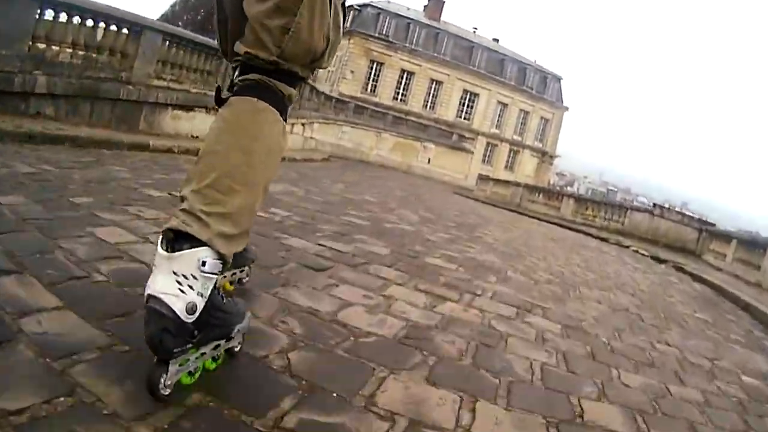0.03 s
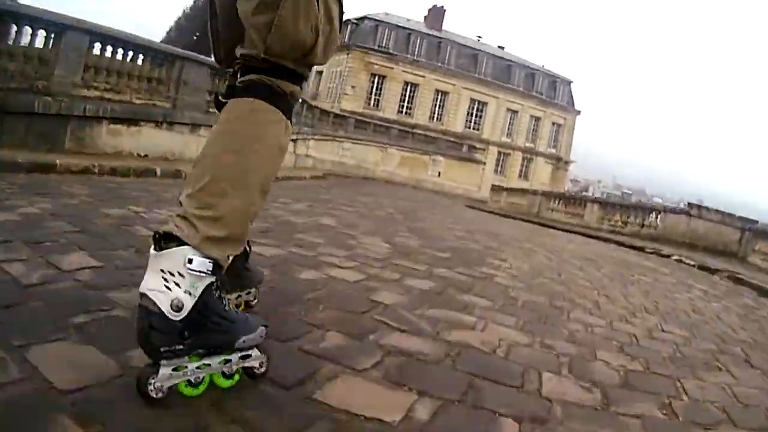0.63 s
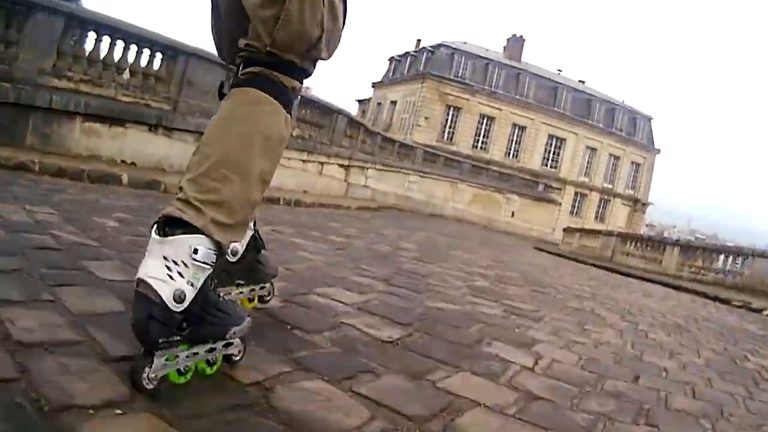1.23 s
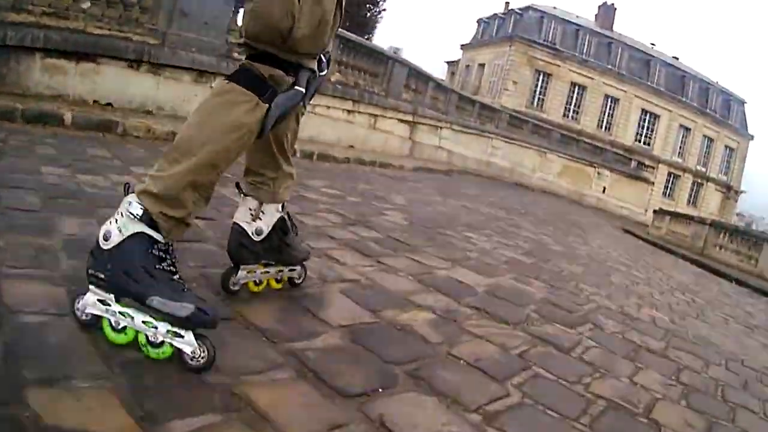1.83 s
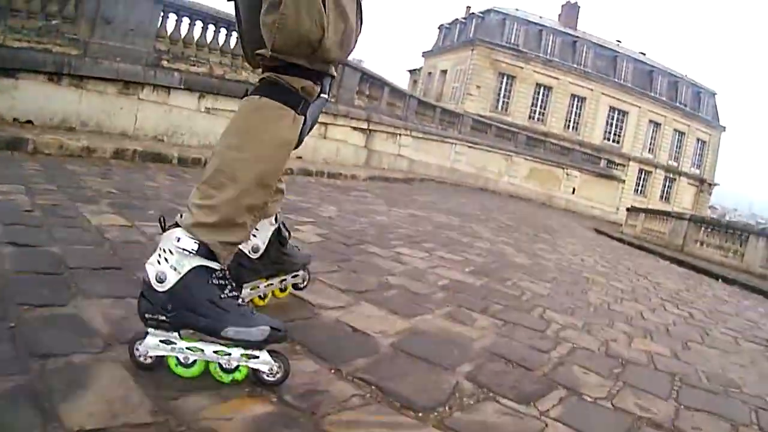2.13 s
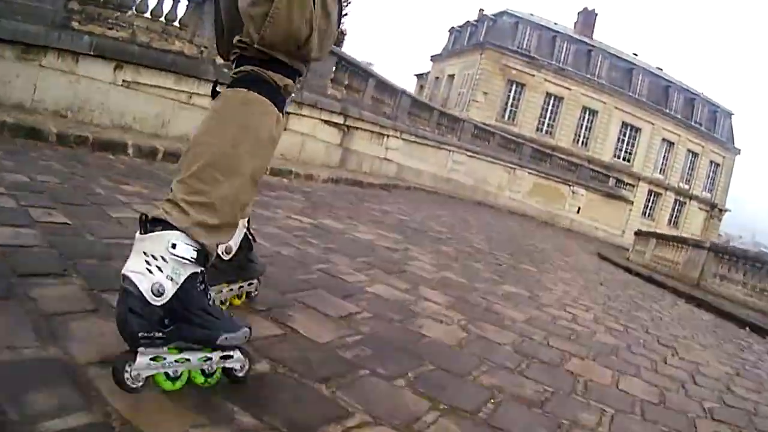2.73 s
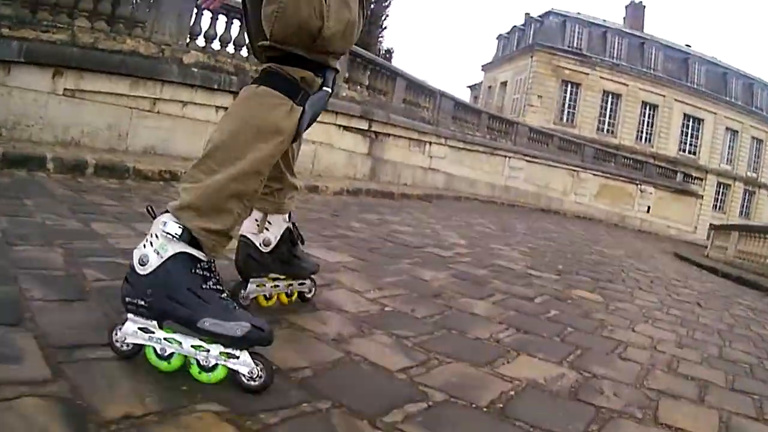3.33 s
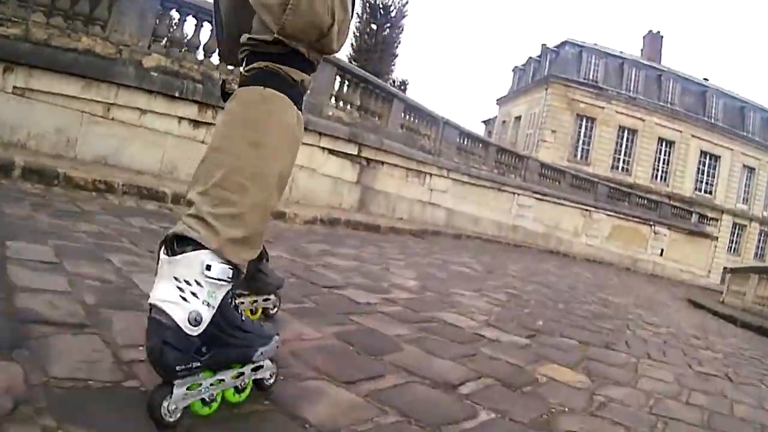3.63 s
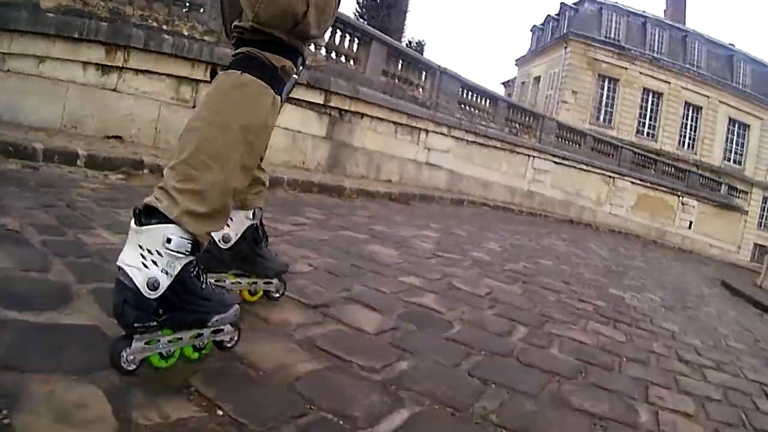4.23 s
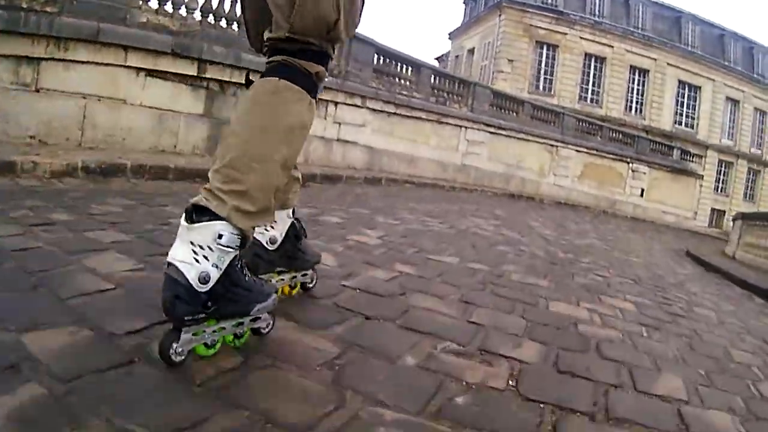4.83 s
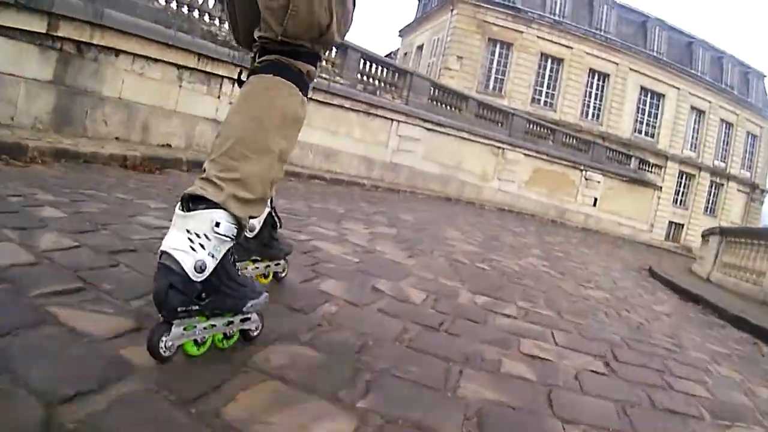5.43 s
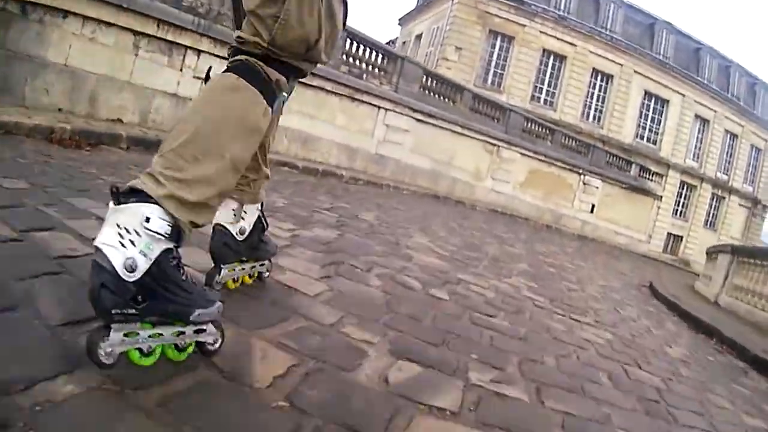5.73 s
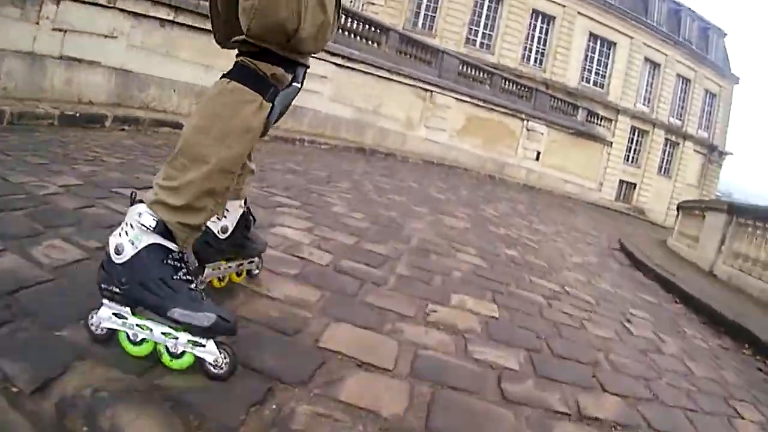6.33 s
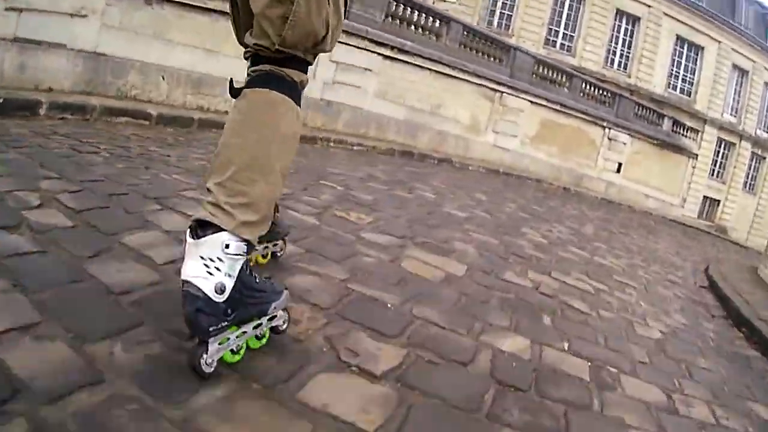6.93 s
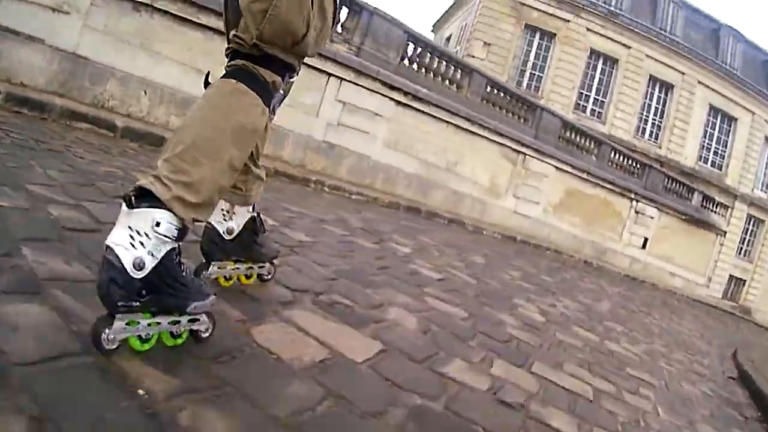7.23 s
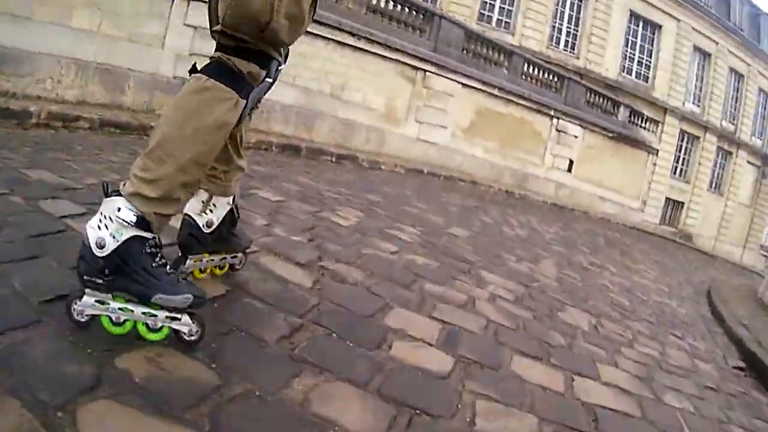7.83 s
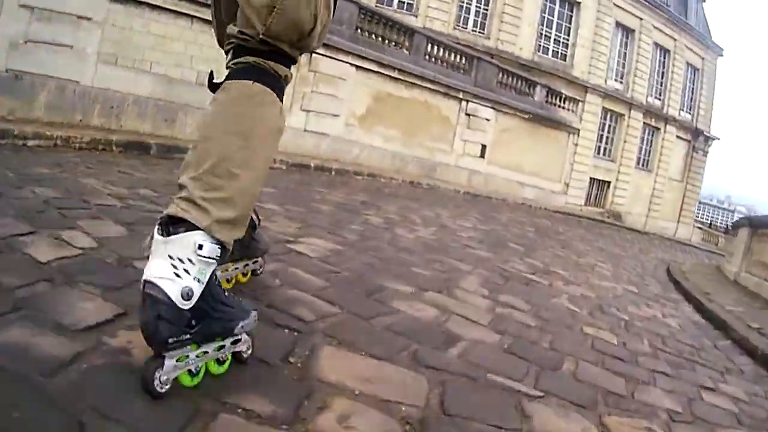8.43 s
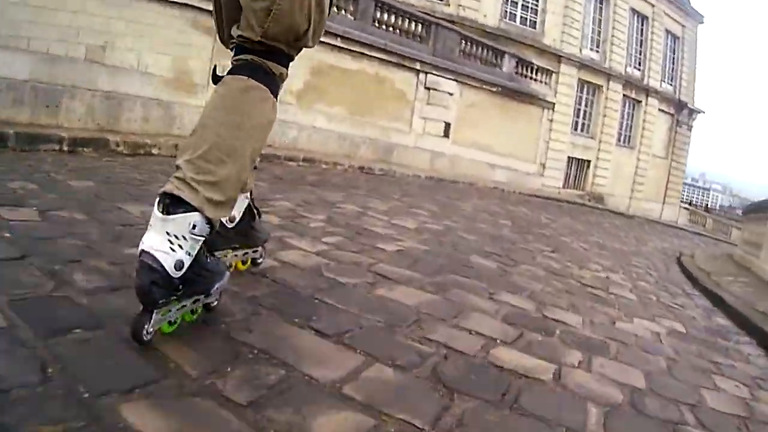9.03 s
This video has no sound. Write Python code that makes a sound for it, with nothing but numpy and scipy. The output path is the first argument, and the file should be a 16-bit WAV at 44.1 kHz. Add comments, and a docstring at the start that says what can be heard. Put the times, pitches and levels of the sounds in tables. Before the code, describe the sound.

A continuous, irregular clatter of inline skate wheels crosses cobblestones outdoors. Each stone gives a dull thud, a hollow knock and a tick, with scattered boot bumps, metallic frame clicks and gritty cracks. The clatter sharpens in several bursts, brightest about three quarters of the way through. The close microphone, in a small cased camera on a pole, picks up low shuddering and gusty wind, with a faint hiss and thin whine behind.

```python
"""On a wet cobbled street, inline skates roll along, heard from a small cased camera on a pole.
The wheels chatter over the rough stone and strike the joints; each contact rings boot and case
with a low thud, a hollow knock and a bright tick. Wheels slap the metal frame, heels knock the
boot shell and grit cracks. Underneath, the pole shudders and wind rumbles over a faint hiss
and an electronic whine."""
import sys
import numpy as np
from scipy import signal
from scipy.fft import rfft, irfft, next_fast_len
from scipy.io import wavfile
from scipy.ndimage import uniform_filter1d

SR = 44100
rng = np.random.default_rng(int(sys.argv[2]) if len(sys.argv) > 2 else 0)


def int16_out(signal):
    """Quantize to a 16-bit WAV file."""
    q = np.round(np.clip(np.atleast_2d(signal).T, -1, 1) * 32767)
    wavfile.write(sys.argv[1], SR, q.astype(np.int16))


N = 400869
TIME = np.arange(N) / SR
RING_SIZE = 4096   # samples set aside for one ring

# the low, middle and high pitches (modes) at which boot and case ring: f/Hz, width/Hz, relative level/dB
THUD_MODES = [(195, 72, 0), (312, 136, -3.5), (440, 136, -10), (558, 129, -8), (729, 124, -9)]
KNOCK_MODES = [(805, 43, -12), (930, 113, -9.5), (998, 82, -6.5), (1120, 77, 0.8), (1307, 94, -8),
               (1401, 133, -13), (1643, 420, -28), (1939, 125, -18.5)]
TICK_MODES = [(2409, 328, -12), (2794, 145, -.5), (3035, 149, 0), (3328, 179, -11.5), (3604, 209, -5.5),
              (3936, 167, -15), (4263, 184, -7.5), (4480, 200, -16), (5148, 360, -16.5), (5438, 231, -17.5),
              (5950, 292, -19.5), (8450, 1306, -32)]
# a wheel slams into a raised stone: t/s, then relative knock level/dB, thud level/dB, tick level/dB
RAISED_STONES = [(0.06, -50, -63, -60), (0.145, -41, -65, -75), (0.198, -45, -55, -60),
                 (0.243, -39.5, -71, -69), (0.317, -35.5, -54, -58), (0.333, -44, -53, -60),
                 (0.418, -41, -59, -62), (0.507, -38, -56, -60), (0.65, -40, -60, -63),
                 (0.783, -39.5, -57, -59), (0.827, -36, -54, -59), (0.977, -39, -51, -54),
                 (1.048, -36.5, -52, -55.5), (1.104, -39.5, -55, -58.5), (1.131, -51, -62, -60),
                 (1.187, -39.5, -65, -63), (1.208, -40.5, -64, -64), (1.349, -38, -57, -56.5),
                 (1.372, -35.5, -57, -57), (1.388, -32, -55, -52.5), (1.461, -35.5, -54, -58),
                 (1.501, -35, -49, -53.5), (1.525, -44, -51, -55), (1.55, -37.5, -50, -54),
                 (1.576, -34, -63, -54), (1.593, -32.5, -49, -53), (1.602, -32, -54, -56),
                 (1.628, -50, -57, -62), (1.685, -48, -62, -55.5), (1.692, -35.5, -51, -58),
                 (1.744, -40.5, -62, -81), (1.803, -39.5, -54, -63), (1.891, -38, -53, -57),
                 (1.935, -39.5, -60, -58), (1.973, -50, -66, -72), (2.016, -37.5, -61, -61),
                 (2.035, -38.5, -62, -61), (2.078, -39, -62, -63), (2.235, -42.5, -56, -61),
                 (2.258, -40, -51, -58), (2.284, -40, -51.5, -63), (2.304, -37.5, -61, -69),
                 (2.377, -43, -71, -62), (2.429, -38, -56, -59), (2.453, -42, -51, -63),
                 (2.523, -39.5, -52, -63), (2.626, -38, -65, -60), (2.655, -38, -61, -66),
                 (2.69, -45, -67, -58), (2.738, -56, -67, -58.5), (2.849, -43, -54, -58),
                 (2.903, -39, -54, -52), (2.921, -38.5, -66, -51), (2.971, -37, -46, -61),
                 (2.991, -40, -60, -57), (3.008, -43, -58, -53), (3.037, -48, -51, -60),
                 (3.07, -38, -53, -46.5), (3.099, -46, -62, -67), (3.117, -44, -55, -60),
                 (3.135, -29.5, -51, -47), (3.195, -38, -48, -50.5), (3.299, -36, -54, -54.5),
                 (3.339, -37.5, -53, -54), (3.414, -40, -51, -60), (3.434, -39, -63, -61),
                 (3.482, -45, -54, -56), (3.512, -37.5, -59, -55), (3.548, -39, -52.5, -65),
                 (3.623, -38, -50, -66), (3.647, -41, -60, -60), (3.868, -35, -60, -55.5),
                 (3.931, -45, -56, -55.5), (3.954, -39, -66, -63), (4.035, -31.5, -63, -58),
                 (4.197, -31.5, -62, -48), (4.238, -40, -58, -55), (4.254, -30, -53, -55),
                 (4.335, -45, -51, -51), (4.356, -31.5, -54, -45), (4.363, -34.5, -61, -54),
                 (4.427, -35, -59, -54.5), (4.485, -41, -56, -57), (4.504, -36, -52, -50.5),
                 (4.516, -39, -58, -59), (4.529, -36, -50, -51), (4.543, -45, -60, -56),
                 (4.556, -32, -60, -57), (4.577, -38, -61, -57), (4.705, -36, -52.5, -55.5),
                 (4.729, -37.5, -58, -56), (4.878, -44, -58, -62), (4.926, -40, -55, -57.5),
                 (5.075, -39.5, -55, -59), (5.098, -37.5, -56, -57), (5.142, -40.5, -63, -60),
                 (5.159, -35, -58, -57), (5.19, -40.5, -58, -62), (5.264, -44, -52, -55),
                 (5.291, -45, -62, -66), (5.32, -43, -57, -65), (5.405, -42, -56, -62),
                 (5.496, -49, -64, -60), (5.532, -40, -61, -58), (5.551, -39, -49, -59),
                 (5.592, -42, -60, -58), (5.655, -54, -70, -62), (5.728, -40.5, -56, -57.5),
                 (5.82, -37.5, -50, -57), (5.906, -35, -62, -51.5), (5.93, -55, -65, -62),
                 (6.05, -38.5, -51, -55), (6.073, -38, -53, -60), (6.126, -55, -65, -61),
                 (6.207, -43, -60, -62), (6.246, -48, -58, -59), (6.287, -41, -52, -61),
                 (6.326, -37, -62, -66), (6.411, -48, -71, -74), (6.473, -38, -53.5, -53),
                 (6.504, -47, -57, -67), (6.693, -37.5, -55, -63), (6.711, -41, -53, -60),
                 (6.734, -51, -58, -60), (6.757, -33.5, -53, -59), (6.87, -38, -66, -62.5),
                 (6.997, -38.5, -51, -61), (7.015, -31.5, -48, -51.5), (7.089, -34.5, -54, -53.5),
                 (7.158, -31.5, -70, -52.5), (7.216, -34, -56, -54.5), (7.288, -37, -56.5, -48),
                 (7.338, -29.5, -54, -46), (7.355, -38, -56, -58), (7.415, -28.5, -45.5, -49.5),
                 (7.45, -39, -58, -54), (7.467, -55, -64, -63), (7.49, -31.5, -62, -49),
                 (7.505, -34.5, -55, -58), (7.561, -33.5, -51, -51), (7.591, -39.5, -48.5, -55.5),
                 (7.644, -34, -53, -58), (7.68, -36.5, -43.5, -49.5), (7.711, -39, -59, -52.5),
                 (7.77, -36, -47, -55), (7.847, -33, -58, -54.5), (7.874, -38, -57, -61),
                 (7.913, -52, -62, -64), (7.982, -39, -57, -61), (8.025, -41, -49, -57),
                 (8.059, -37, -50, -57.5), (8.12, -35.5, -56, -58), (8.198, -37.5, -69, -63),
                 (8.242, -43, -61, -71), (8.338, -43, -56, -63), (8.366, -39, -52, -55),
                 (8.421, -44, -64, -59), (8.447, -42, -58, -62), (8.486, -46, -58, -60),
                 (8.579, -34.5, -56, -53.5), (8.634, -41, -54, -66), (8.723, -43, -56, -56.5),
                 (8.817, -37, -46.5, -51), (8.838, -39, -58, -59), (8.952, -43, -65, -56),
                 (9.043, -32.5, -48, -53), (9.082, -37, -52, -59)]


def from_db(db):
    """Turn decibels into a factor to multiply by."""
    return 10 ** (np.asarray(db) / 20)


def unit_power(x):
    """Scale a signal to an average power of 1."""
    return x / np.sqrt(np.mean(x ** 2) + 1e-20)


def curve(rows):
    """Join (time, value) points with straight lines, one value per sample."""
    return np.interp(TIME, *np.transpose(rows))


def swell(t, peak_s):
    """A level that rises to 1 at peak_s and dies away."""
    return t / peak_s * np.exp(1 - t / peak_s)


def drift(rate_hz):
    """A smooth random wander, typically of size 1."""
    r = np.exp(-80 * np.pi * rate_hz / SR)
    slow = signal.lfilter([1], [1, -2 * r, r * r], rng.standard_normal(N // 40 + 2002))[2000:]
    return np.interp(np.arange(N) / 40, np.arange(len(slow)), unit_power(slow))


def noise(spectrum):
    """Noise of power 1, coloured by rows of f/Hz, relative level/dB."""
    hz, db = np.transpose(spectrum)
    size = next_fast_len(N)
    f = np.maximum(np.fft.rfftfreq(size, 1 / SR), 1)
    gains = from_db(np.interp(np.log(f), np.log(hz), db))
    return unit_power(irfft(rfft(rng.standard_normal(size)) * gains, size)[:N])


def resonate(x, hz, width):
    """Let x ring at one pitch; a narrower width rings longer."""
    r = np.exp(-np.pi * width / SR)
    feedback = [1, -2 * r * np.cos(2 * np.pi * hz / SR), r * r]
    return signal.lfilter(np.array([1, 0, -1]) * (1 - r * r) / 2, feedback, x)


def tap_response(modes, tilt_db, extra_db=0):
    """How a set of modes rings after one tap; tilt_db lifts the higher ones, in dB per octave."""
    hz, width, db = np.transpose(modes)[:, :, None]
    f = np.fft.rfftfreq(RING_SIZE, 1 / SR)
    gains = from_db(db + extra_db + tilt_db * np.log2(hz / hz[0]))
    # boot and case filter in turn, so each peak has doubly steep sides
    peaks = gains / (1 + (np.sqrt(2) - 1) * (2 * (f - hz) / width) ** 2)
    # minimum phase: the ring starts with the tap and only dies away
    cepstrum = irfft(np.log(np.sum(peaks ** 2, axis=0)) / 2)
    after_tap = 1 + np.sign(np.fft.fftfreq(RING_SIZE))
    return irfft(np.exp(rfft(cepstrum * after_tap)))


def pitched_clacks(hits, partials, swell_s):
    """Short rings of a few tones (partials); the side tones shift a little with each hit."""
    t, out = np.arange(RING_SIZE) / SR, np.zeros(N + RING_SIZE)
    ratio, partial_db = np.transpose(partials)[:, :, None]
    for s, hz, db in hits:
        stretch, phase = rng.uniform(-1.06, 1, (2, len(ratio), 1))
        partial_hz = hz * ratio ** (1 + stretch / 10)
        tones = from_db(partial_db) * np.sin(2 * np.pi * partial_hz * t + np.pi * phase)
        start = int(s * SR)
        out[start:start + RING_SIZE] += from_db(db) * swell(t, swell_s) * tones.sum(axis=0)
    return out[:N]


def electronics(hiss_db=-68, wander=0.001476):
    """The camera's electronics add an even hiss and a whine of thin, wavering tones."""
    # colour of the hiss: f/Hz, relative level/dB
    hiss_colour = [(500, 7), (2500, 2), (4500, -2.5), (7000, -3), (10000, -5.5), (12500, -7.5),
                   (14400, -11.5), (15500, -23)]
    # tones of the whine: f/Hz, average level/dB
    whine_tones = [(1415, -78), (2831, -80), (4260, -87), (5661, -96), (8521, -93), (9921, -97)]
    whine = np.zeros(N)
    for hz, db in whine_tones:
        wavering_hz = hz * (1 + wander * drift(19.8))
        whine += from_db(db) * np.sqrt(2) * np.sin(2 * np.pi * np.cumsum(wavering_hz) / SR)
    return from_db(hiss_db) * noise(hiss_colour) + whine


def wind(shake_db, level_db=-63, follows=0.27, gust_db=3.0):
    """Gusty wind brushes the case, a little louder when the pole shakes hard."""
    # colour of the rumble: f/Hz, relative level/dB
    wind_colour = [(30, -23), (80, -7), (120, 0), (170, -3.5), (240, -11.5), (400, -25), (900, -69)]
    return from_db(level_db + follows * shake_db + gust_db * drift(4.9)) * noise(wind_colour)


def shaking(lurch_db=1.5):
    """How hard the pole shakes, in dB above or below its average, with random lurches."""
    # strength of the shaking: t/s, relative level/dB
    strength = [(0.0, -49), (0.2, -52), (0.35, -48.5), (0.85, -46.5), (1.3, -46.5), (1.7, -48.5),
                (1.92, -44.5), (2.2, -48), (2.6, -45.5), (2.76, -49.5), (2.97, -45), (3.3, -49),
                (3.48, -43), (3.7, -45), (3.93, -51.5), (4.07, -41.5), (4.25, -45), (4.93, -50), (5.1, -42),
                (5.85, -45.5), (5.98, -48.5), (6.22, -54), (6.34, -44), (6.48, -44), (6.8, -43),
                (7.08, -44.5), (7.58, -38), (7.72, -42.5), (7.99, -49.5), (8.15, -40), (8.55, -37),
                (8.85, -42.5), (9.09, -45.5)]
    db = curve(strength)
    return db - db.mean() + lurch_db * drift(6.2)


def tremble(hz, width, evenness):
    """A low mode shaken at random; evenness, from 0 to 1, steadies the size of its swing."""
    near_pitch = signal.butter(3, [hz * 0.675, hz * 1.355], "band", fs=SR, output="sos")
    swing = signal.sosfilt(near_pitch, resonate(rng.standard_normal(N + SR), hz, width))[SR:]
    power = uniform_filter1d(swing ** 2, SR // 8) + 1e-18
    return unit_power(swing / power ** (evenness / 2))


def pole(shake_db, sway_db=-47.0, mount_db=-52.0, mount_follows=0.41, judder_db=1.46,
         shudder_gain_db=-5.0, shudder_s=0.037):
    """The pole sways with the shaking; the camera mount trembles and swells into shudders."""
    # the mount shudders over a run of uneven stones: peak t/s, relative level/dB
    shudders = [(0.35, -38), (1.53, -35.5), (1.86, -42), (2.26, -39.5), (3.14, -38), (3.29, -41),
                (3.44, -44), (3.79, -40), (4.36, -39.5), (4.52, -37.5), (5.17, -37.5), (5.58, -41.5),
                (5.85, -43), (6.09, -41), (6.2, -42.5), (6.32, -40), (6.42, -45), (6.75, -42), (6.94, -43),
                (7.57, -46), (7.67, -40.5), (7.77, -39.5), (7.92, -39.5), (8.03, -41.5), (8.15, -42),
                (8.37, -47), (8.85, -40.5)]
    swells = np.zeros(N)
    for s, db in shudders:
        distance = np.minimum(abs(TIME - s) / shudder_s, 10)
        swells += from_db(db + shudder_gain_db) * np.exp(-.5 * distance ** 2)
    sway = from_db(sway_db + shake_db) * tremble(hz=27.5, width=6.2, evenness=0.69)
    mount_level = np.hypot(from_db(mount_db + mount_follows * shake_db), swells)
    judder = from_db(judder_db * drift(17))
    return sway + mount_level * judder * tremble(hz=59.8, width=24, evenness=0.62)


def pole_jolts(swing_hz=31, swing_s=0.021, ring_hz=61, ring_s=0.013, ring_db=-2):
    """A jolt sets the pole swinging for a few cycles and rings briefly in the camera mount."""
    # jolts through the pole: t/s, level/dB of the swing
    jolts = [(0.005, -37.5), (1.174, -30), (2.56, -42), (2.929, -37.5), (4.675, -30.5), (5.239, -43),
             (7.17, -32), (7.55, -42)]
    t, out = np.arange(SR // 2) / SR, np.zeros(N + SR)
    swing = swell(t, swing_s) * np.sin(2 * np.pi * swing_hz * t)
    ring = from_db(ring_db) * swell(t, ring_s) * np.sin(2 * np.pi * ring_hz * t)
    for s, db in jolts:
        start = int(s * SR)
        out[start:start + len(t)] += from_db(db) * (swing + ring)
    return out[:N]


def boot_bumps(swell_s=0.0038, gain_db=-7.0):
    """The whole boot drops onto a lower stone: a few low cycles, pitched differently each time."""
    # drops of the boot: t/s, f/Hz, relative level/dB
    drops = [(0.317, 163, -42), (0.809, 181, -39.5), (1.035, 177, -40), (1.188, 156, -42.5),
             (1.509, 190, -42), (1.598, 199, -51), (1.68, 140, -40), (1.963, 173, -40.5), (2.035, 149, -40),
             (2.173, 171, -36.5), (2.253, 160, -34.5), (2.373, 150, -38), (2.834, 174, -40.5),
             (2.965, 180, -36), (3.03, 177, -42), (3.188, 182, -34), (3.415, 180, -34), (3.621, 160, -43),
             (3.784, 180, -40.5), (4.105, 154, -40.5), (5.064, 156, -40.5), (5.154, 150, -34.5),
             (5.291, 151, -40), (5.547, 163, -40.0), (5.993, 170, -37.5), (6.107, 151, -40),
             (6.184, 156, -36), (6.256, 154, -37.5), (6.388, 174, -39.5), (6.69, 174, -40),
             (6.758, 164, -34.5), (6.992, 174, -42.5), (7.667, 152, -36), (7.97, 188, -36.5),
             (8.025, 171, -37), (8.108, 176, -40), (8.197, 160, -36.5), (8.237, 180, -43),
             (8.336, 173, -37), (8.487, 153, -47), (8.692, 161, -39), (8.816, 157, -41.5),
             (8.998, 152, -40), (9.041, 169, -36)]
    t, out = np.arange(SR // 10) / SR, np.zeros(N + SR)
    for s, hz, db in drops:
        tone = np.sin(2 * np.pi * (hz * t + rng.random()))
        start = int(s * SR)
        out[start:start + len(t)] += from_db(db + gain_db) * swell(t, swell_s) * tone
    return out[:N]


def heel_knocks(gain_db=-2.0):
    """A heel lands and the boot shell knocks hollowly."""
    # heel landings: t/s, f/Hz, relative level/dB
    landings = [(0.195, 272, -38), (1.467, 377, -33), (1.523, 407, -41), (1.601, 397, -40),
                (2.838, 296, -50), (2.972, 347, -39), (3.276, 410, -50), (3.416, 330, -54),
                (4.322, 260, -50), (5.036, 312, -47), (5.157, 690, -33), (5.224, 405, -48),
                (5.549, 330, -50), (5.578, 270, -42), (5.994, 350, -46), (6.276, 370, -49),
                (6.388, 297, -44), (6.731, 283, -43), (6.83, 265, -38), (7.004, 345, -45),
                (7.336, 507, -38.5), (7.98, 324, -40.5), (8.24, 306, -45), (8.483, 324, -46)]
    # tones of the shell: ratio to the main pitch, relative level/dB
    shell_partials = [(0.68, -6.5), (1, -3.5), (1.4, -19)]
    return from_db(gain_db) * pitched_clacks(landings, shell_partials, swell_s=0.0017)


def edge_cracks(swell_s=0.00052):
    """A burst of crushed grit, a few milliseconds long, rings the highest modes."""
    # a sharp stone edge cracks under a wheel: t/s, level/dB
    cracks = [(1.388, -57), (1.577, -57), (1.602, -59), (2.849, -63), (3.071, -67), (3.133, -59),
              (3.34, -71), (3.402, -62), (4.197, -64), (4.254, -61), (4.355, -54), (5.264, -62),
              (6.052, -57), (7.005, -56), (7.337, -47.5), (7.415, -52.5), (7.489, -64), (7.561, -56)]
    # modes that a crack rings: f/Hz, width/Hz, relative level/dB
    crack_modes = [(5100, 400, 0), (5430, 330, -1), (5930, 400, -3.5), (8400, 3000, -15)]
    t, out = np.arange(RING_SIZE) / SR, np.zeros(N + RING_SIZE)
    for s, db in cracks:
        grit = swell(t, swell_s) * rng.standard_normal(RING_SIZE)
        crack = sum(from_db(mode_db) * resonate(resonate(grit, hz, width), hz, width)
                    for hz, width, mode_db in crack_modes)
        crack *= np.sqrt(2 * swell_s * SR / np.sum(crack ** 2))
        start = int(s * SR)
        out[start:start + RING_SIZE] += from_db(db) * crack
    return out[:N]


def wheel_effort():
    """How hard the wheels work on the paving, in dB above or below the average."""
    # the effort: t/s, relative level/dB
    effort = [(0.0, -56), (1.44, -58), (1.62, -58.5), (2.12, -53), (2.28, -57.5), (2.91, -54.5),
              (3.04, -55.5), (4.03, -57.5), (4.53, -55.5), (5.64, -57.5), (6.05, -54.5), (6.58, -56),
              (6.96, -62.5), (7.54, -55.5), (8.48, -54.5), (9.09, -60)]
    db = curve(effort)
    return db - db.mean()


def rough_stone(per_s, size_db, clump_db):
    """Small bumps under the wheels give random taps of uneven size, clumped stone by stone."""
    sizes = from_db(size_db * np.minimum(rng.exponential(1, N), 2) + clump_db * drift(19.0))
    is_tap = rng.random(N) < per_s / SR
    return unit_power(is_tap * sizes * rng.choice([-1, 1], N))


def chatter(modes, taps, level_db, tilt_db, grit):
    """Taps and fine grit keep a set of modes ringing."""
    force = taps + grit * rng.standard_normal(N)
    return from_db(level_db) * unit_power(signal.fftconvolve(force, tap_response(modes, tilt_db))[:N])


def rolling_wheels(thud_gain_db=-3.5, knock_db=-58.0, tick_db=-76.0,
                   knock_follows=0.81, tick_follows=0.63):
    """Wheels roll over rough stone; knock and tick each follow the effort by their own share."""
    # the low part of the rolling: t/s, relative level/dB
    low_roll = [(0.0, -58.5), (0.28, -63), (1.37, -63), (1.57, -61.5), (5.19, -60.5), (5.32, -62.5),
                (5.77, -63), (6.1, -60.5), (7.19, -62), (7.62, -59.5), (8.45, -61.5), (9.09, -61)]
    effort_db = wheel_effort()
    taps = rough_stone(per_s=330, size_db=5.0, clump_db=2.0)
    sand = 0.93 * rough_stone(per_s=130, size_db=10.5, clump_db=6)   # crushed grains only tick
    thud = chatter(THUD_MODES, taps, curve(low_roll) + thud_gain_db, tilt_db=4.0, grit=1.0)
    knock = chatter(KNOCK_MODES, taps, knock_db + knock_follows * effort_db, tilt_db=-0.3, grit=0.86)
    tick = chatter(TICK_MODES, taps + sand, tick_db + tick_follows * effort_db, tilt_db=5.5, grit=0.32)
    return thud + knock + tick


def airborne_lulls(half_width_s=0.0054, depth_db=-2.5):
    """Gain of the rolling: it dips as the wheel leaves the ground just before slamming into a raised stone."""
    lull_s = np.array(RAISED_STONES)[:, 0] - half_width_s
    marks = np.zeros(N)
    marks[(lull_s * SR).astype(int)] = 1
    t = np.arange(-SR // 20, SR // 20) / SR
    dip = np.exp(-.5 * (t / half_width_s) ** 2)
    return from_db(depth_db * np.minimum(signal.fftconvolve(marks, dip, "same"), 1))


def wheel_hits(modes, times, levels_db, tilt_db, harder_db, scuff, scuff_s, rattle, rattle_s,
               vary_db, detune, cleaner, hit_s=.012):
    """Each hit is a blow, a brief scuff and a rattle, ringing the modes in a new mix and tuning."""
    t, out = np.arange(RING_SIZE) / SR, np.zeros(N + RING_SIZE)
    scuff_fade = scuff * np.exp(-t / scuff_s) / np.sqrt(scuff_s * SR / 2)
    rattle_fade = rattle * np.exp(-t / rattle_s) / np.sqrt(rattle_s * SR / 2)
    for s, db in zip(times, levels_db):
        above_db = db - np.mean(levels_db)
        force = (scuff_fade + rattle_fade) * rng.standard_normal(RING_SIZE)
        force *= from_db(-cleaner * max(above_db, 0))   # hard blows scuff less
        force[0] += rng.choice([-1, 1])   # the blow itself
        mix_db = vary_db * rng.uniform(-1.25, 1, (len(modes), 1))
        tuned = np.array(modes) * [1 + detune * rng.uniform(-1.23, 1), 1, 1]
        start = max(int(s * SR), 0)
        if start < N:
            tilt = tilt_db + harder_db * above_db / 10   # strength changes the colour
            hit = signal.fftconvolve(force, tap_response(tuned, tilt, mix_db))[:RING_SIZE]
            hit *= np.sqrt(hit_s * SR / np.sum(hit ** 2))   # as much energy as power 1 for hit_s
            out[start:start + RING_SIZE] += from_db(db) * hit
    return out[:N]


def frame_rattle(per_s=28, count=400, level_db=-75, spread_db=4, follows=0.4,
                 click_gain_db=-18.0, ring_gain_db=-3.5):
    """Loose wheels click against the metal frame, louder under effort; hard slaps also make it ring."""
    # hard slaps on the frame: t/s, f/Hz, relative level/dB
    slaps = [(1.105, 3100, -46), (1.462, 2780, -49), (1.576, 1930, -39), (1.578, 2880, -47),
             (1.625, 2840, -49), (2.236, 2820, -58), (2.283, 2820, -53), (2.922, 3030, -38),
             (2.993, 2820, -51), (3.009, 3620, -49), (3.072, 2900, -42), (3.152, 3010, -45),
             (3.217, 3570, -51), (3.402, 2800, -51), (3.482, 2780, -54), (3.743, 3000, -47),
             (4.036, 2910, -40), (4.085, 2780, -47), (4.197, 2960, -44), (4.254, 2950, -38),
             (4.357, 1900, -46), (4.484, 3000, -57), (5.655, 2760, -52), (5.985, 2900, -48.5),
             (6.712, 3620, -51), (7.005, 3470, -45), (7.119, 3550, -52), (7.338, 3000, -33),
             (7.415, 2820, -40), (7.489, 1940, -41), (7.711, 2760, -46), (8.007, 2900, -47.5),
             (8.519, 2870, -47.5), (8.84, 3500, -54), (9.018, 3080, -47.5), (9.083, 2830, -53)]
    # tones of the frame: ratio to the main pitch, relative level/dB
    frame_partials = [(0.66, -10), (0.999, -3), (1.09, -17), (1.23, -21)]
    gap, size = rng.random((count, 2)).T
    small_s = np.cumsum(-np.log(1 - gap)) / per_s
    small_db = level_db + spread_db * (2 * size - 1) + follows * np.interp(small_s, TIME, wheel_effort())
    slap_s, _, slap_db = np.transpose(slaps)
    clicks = wheel_hits(TICK_MODES, np.r_[small_s, slap_s], np.r_[small_db, slap_db + click_gain_db],
                        tilt_db=-3.0, harder_db=-1.5, scuff=1.0, scuff_s=0.0016,
                        rattle=0.5, rattle_s=0.013, vary_db=5.0, detune=0.013, cleaner=0.11)
    return clicks + from_db(ring_gain_db) * pitched_clacks(slaps, frame_partials, swell_s=0.0015)


def paving_joints(per_s=14, count=160, jitter=.3, spread_db=1.5, colour_db=1.8):
    """Joints pass unevenly, louder under effort: rows of t/s, then thud, knock and tick level/dB."""
    usual_db = np.array([-61.5, -56.5, -72])
    chance = rng.standard_normal((count, 5))
    s = (np.arange(count) + .5 + jitter * chance[:, 0]) / per_s
    strength_db = np.interp(s, TIME, wheel_effort()) + spread_db * chance[:, 1]
    return np.column_stack([s, usual_db + strength_db[:, None] + colour_db * chance[:, 2:]])


def next_wheel(hits, delay_s=.018, jitter=.15, gain_db=-15):
    """The following wheel meets the same edges a moment later and more softly."""
    delays = delay_s * (1 + jitter * rng.standard_normal(len(hits)))
    return np.column_stack([hits[:, 0] + delays, hits[:, 1:] + gain_db])


def cobble_clatter(thud_gain_db=-4.0, knock_gain_db=-11.5, tick_gain_db=-6.0):
    """Wheels strike raised stones and joints: each gives a low thud, a hollow knock and a bright tick."""
    small_hits = paving_joints()
    s, knock_db, thud_db, tick_db = np.transpose(RAISED_STONES)
    big_hits = np.column_stack([s, thud_db + thud_gain_db, knock_db + knock_gain_db,
                                tick_db + tick_gain_db])
    s, thud_db, knock_db, tick_db = np.vstack([big_hits, next_wheel(big_hits), small_hits]).T
    thud = wheel_hits(THUD_MODES, s, thud_db, tilt_db=4.0, harder_db=-2.5, scuff=0.64, scuff_s=0.0086,
                      rattle=0.4, rattle_s=0.011, vary_db=5.5, detune=0.092, cleaner=0.18)
    knock = wheel_hits(KNOCK_MODES, s, knock_db, tilt_db=2.0, harder_db=-1.0, scuff=0.84, scuff_s=0.012,
                       rattle=0.15, rattle_s=0.006, vary_db=3.5, detune=0.026, cleaner=0.26)
    tick = wheel_hits(TICK_MODES, s, tick_db, tilt_db=-4.5, harder_db=1.5, scuff=2.7, scuff_s=0.0034,
                      rattle=0.99, rattle_s=0.034, vary_db=4.0, detune=0.016, cleaner=0.19)
    return thud + knock + tick


def scene():
    """The skates over the rumble and hiss, in one channel."""
    shake_db = shaking()
    background = pole(shake_db) + wind(shake_db) + pole_jolts() + electronics()
    wheels = rolling_wheels() * airborne_lulls() + cobble_clatter()
    boots = boot_bumps() + heel_knocks()
    return (background + wheels + boots + frame_rattle() + edge_cracks())[None]


def record(dry, fade_s=.004, cutoff_hz=15650):
    """The sound fades in and out, and the highest treble is cut steeply."""
    to_nearest_end_s = np.minimum(TIME, TIME[::-1])
    fade = np.sin(np.pi / 2 * np.minimum(to_nearest_end_s / fade_s, 1)) ** 2
    treble_cut = signal.ellip(12, .1, 80, cutoff_hz, fs=SR, output="sos")
    return signal.sosfilt(treble_cut, dry * fade)


dry = scene()
out = record(dry)
int16_out(out)
```